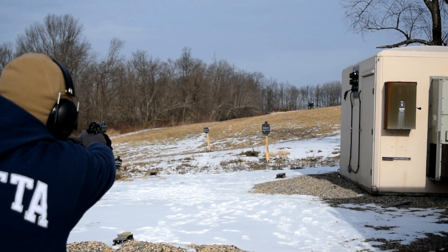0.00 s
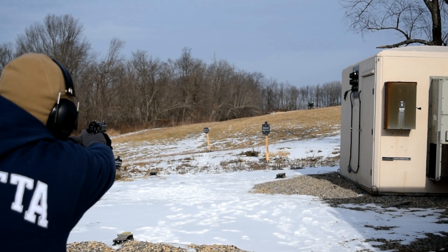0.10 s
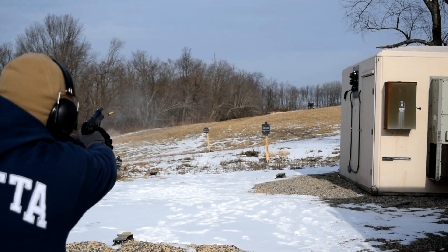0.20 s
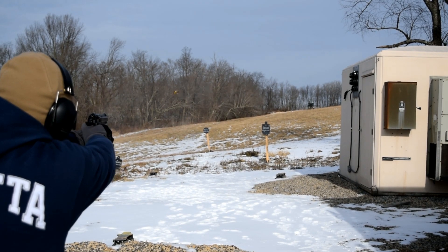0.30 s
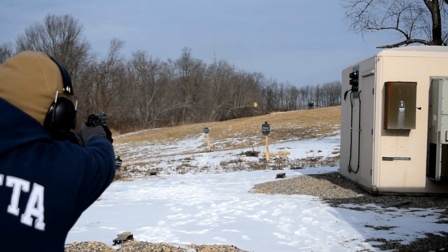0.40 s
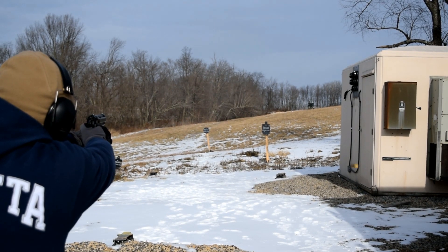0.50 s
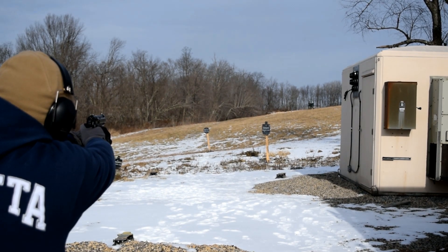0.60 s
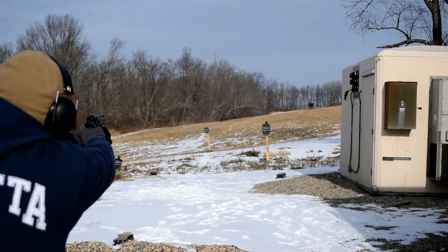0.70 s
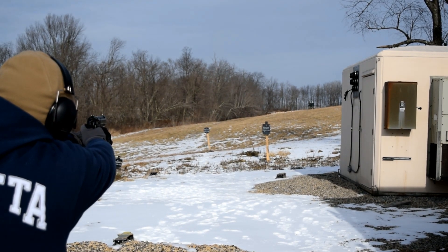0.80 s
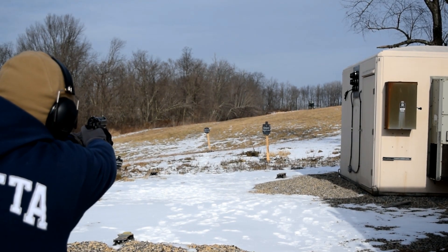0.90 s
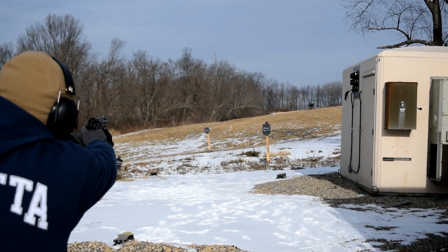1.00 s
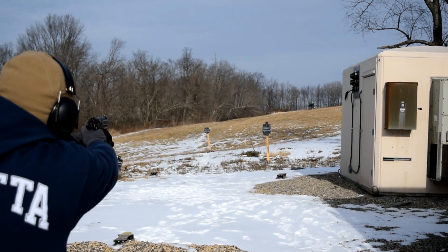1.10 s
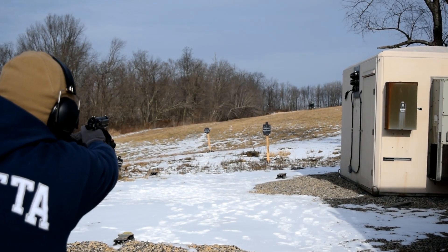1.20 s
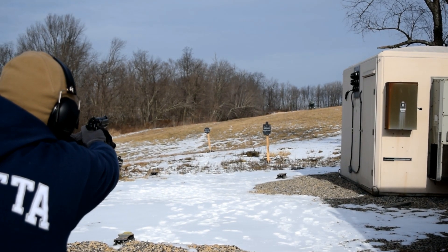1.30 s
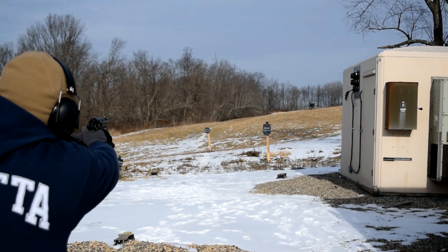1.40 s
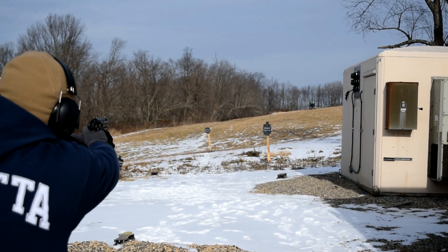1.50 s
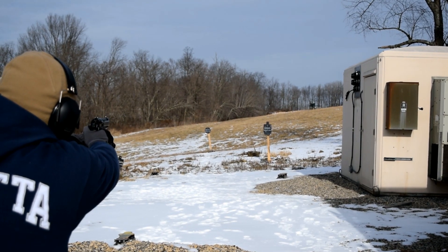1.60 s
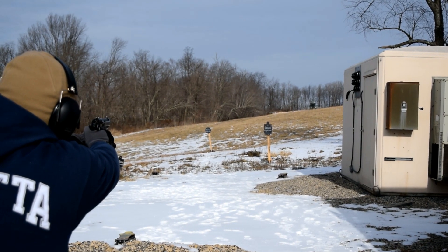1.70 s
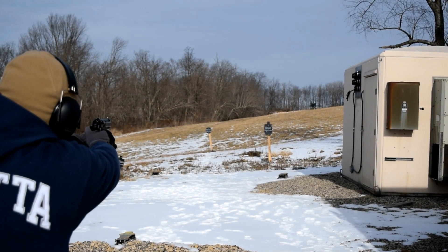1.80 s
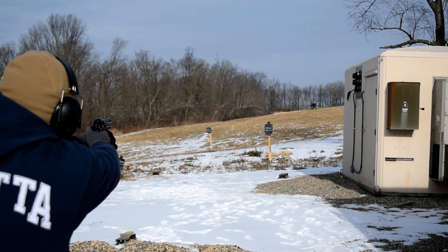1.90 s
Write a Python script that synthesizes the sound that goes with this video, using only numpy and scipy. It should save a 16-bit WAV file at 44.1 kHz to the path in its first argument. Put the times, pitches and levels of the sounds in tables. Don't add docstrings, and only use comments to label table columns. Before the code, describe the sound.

Faint wind and hiss, then a single hard pistol blast close to the microphone, a rapid clatter of slap echoes, and a rough mid-toned rumble from distant trees fading away, with the background ducked then returning.

```python
import sys
import numpy as np
from scipy import signal
from scipy.fft import rfft, irfft
from scipy.io import wavfile
from scipy.ndimage import uniform_filter1d, minimum_filter1d, map_coordinates

SR = 44100
rng = np.random.default_rng(int(sys.argv[2]) if len(sys.argv) > 2 else 0)


def dump(signal):
    limited = np.clip(np.atleast_2d(signal).T, -1, 1)
    pcm = np.round(limited * 32767).astype(np.int16)
    wavfile.write(sys.argv[1], SR, pcm)


def to_linear_factor(level_db):
    exponent = np.asarray(level_db, float) / 20
    return 10 ** exponent


N = 88200

SHOT_S = 0.2484
BLAST_DB, BLAST_T60_S = 24, 0.059
# start_s, body_db, edge_db, pitch_hz, t60_s (time to fade by 60 dB)
SLAPS = [(0.303, 10.5, -8, 725, 0.011), (0.311, -7.5, -17, 926, 0.011), (0.318, -5, -31, 1013, 0.011),
         (0.328, -5, -17, 882, 0.011), (0.355, -0.5, -76, 875, 0.011), (0.374, -1.5, -12, 927, 0.011),
         (0.391, -16.5, -30, 895, 0.011), (0.403, -32, -30.5, 743, 0.011), (0.418, 1, -4.5, 1157, 0.011),
         (0.421, -16.5, -43, 1110, 0.011), (0.448, -18, -27, 1340, 0.011), (0.473, -21.5, -23, 960, 0.011),
         (0.494, -23, -34.5, 834, 0.011), (0.525, -25, -38, 894, 0.011), (0.56, -18, -27, 1060, 0.011),
         (0.571, -14.5, -29, 1040, 0.011)]
# start_s, peak_db
TICKS = [(0.5894, -32), (0.6075, -31), (0.627, -34), (0.6519, -31), (0.6714, -32), (0.6914, -35),
         (0.7472, -33), (0.8254, -42), (0.9547, -28), (0.9614, -37), (0.9794, -42), (1.0051, -41),
         (1.0114, -39), (1.072, -34), (1.1353, -37), (1.2296, -37), (1.3374, -54), (1.5279, -36)]
# frequency_hz, level_db
FAR_TONE = [(120, -32), (250, -33), (370, -16), (600, -3), (760, 0), (980, 0), (1300, -12), (1700, -26),
            (4000, -77.5)]
# frequency_hz, level_db
BRIGHT_TONE = [(1200, -23.5), (1900, 4.5), (2600, 10.5), (3100, -3.5), (3500, -10), (4500, -15),
               (8000, -66)]
# frequency_hz, level_db
SHARP_TONE = [(800, 4.5), (2500, 15), (8000, 0.5), (16000, -15.5)]
# frequency_hz, level_db
FIZZ_TONE = [(2000, -19), (3500, 4.5), (5000, 0), (8000, -12.5), (15000, -28.5)]


def seconds():
    return np.arange(N) / SR


def noise():
    return rng.standard_normal(N)


def unit(x):
    return x / np.sqrt(np.mean(x ** 2) + 1e-20)


def curve(rows):
    times, values = np.transpose(rows)
    return np.interp(seconds(), times, values)


def wobble(rate_hz):
    points = rng.standard_normal(int(N * rate_hz / SR) + 4)
    return map_coordinates(points, [np.arange(N) * rate_hz / SR])


def colour(x, tone):
    size = 8192
    hz, db = np.transpose(tone)
    bins = np.fft.rfftfreq(size, 1 / SR)
    gain = to_linear_factor(np.interp(np.log(bins + 1), np.log(hz), db))
    cepstrum = irfft(np.log(np.maximum(gain, 1e-4)))
    cepstrum[1:size // 2] *= 2
    cepstrum[size // 2 + 1:] = 0
    response = irfft(np.exp(rfft(cepstrum)))
    return signal.fftconvolve(x, response / np.linalg.norm(response))[:N]


def bursts(rows):
    out, t = np.zeros(N + SR), np.arange(SR // 2) / SR
    for start, db, t60 in rows:
        out[round(start * SR):][:len(t)] += to_linear_factor(db - 60 * t / t60) * rng.standard_normal(len(t))
    return out[:N]


def puff(level_db, centre_s, width_s):
    return noise() * to_linear_factor(level_db) * np.exp(-((seconds() - centre_s) / width_s) ** 2)


def limited(x, top, hold_s):
    hold = round(hold_s * SR)
    need = np.minimum(1, top / (np.abs(x) + 1e-9))
    return x * uniform_filter1d(minimum_filter1d(need, 2 * hold), hold)


def squeeze(x, top, hard):
    return x / (1 + np.abs(x / top) ** hard) ** (1 / hard)


def ambience():
    # frequency_hz, level_db
    wind_tone = [(15, -5), (25, -3.5), (59, -6), (162, -15), (280, -10), (408, -18.5), (810, -23.5),
                 (945, -19), (1500, -44), (1950, -81), (3300, -120)]
    # frequency_hz, level_db
    hiss_tone = [(1000, 4.5), (3000, -3.5), (15000, -4)]
    # time_s, hiss_level_db
    gain_moves = [
        (0.0, -52.5),
        (0.38, -50.5),
        (0.53, -63.5),
        (0.71, -84),
        (0.91, -71),
        (1.18, -67),
        (1.48, -60),
        (1.85, -51.5),
        (2.0, -53.5),
    ]
    wind_db, gust_db, hiss_db = 17, 2, 3
    wind = unit(colour(noise(), wind_tone)) * to_linear_factor(1 + wind_db + gust_db * wobble(5.34))
    hiss = unit(colour(noise(), hiss_tone)) * to_linear_factor(hiss_db)
    return to_linear_factor(curve(gain_moves)) * (wind + hiss)


def spent_case():
    # frequency_hz, level_db
    case_tone = [(5000, -25), (10000, 0), (16000, 0)]
    return colour(bursts([(0.9555, -34, 0.012)]), case_tone)


def trunks():
    per_s, spread_db, biggest = 1400, 5, 0.15
    chance, side, size = rng.random((3, N))
    hits = (chance < per_s / SR) * np.sign(side - 0.5)
    return unit(hits * to_linear_factor(-spread_db * np.log(size + biggest)))


def hillside():
    # time_s, level_db
    hill_levels = [(0.44, -38), (0.444, -32), (0.574, -20), (0.592, -6.5), (0.934, -16), (1.012, -7),
                   (1.052, -16.5), (1.13, -14), (1.142, -15.5), (1.152, -12), (1.452, -19.5), (1.534, -16),
                   (1.578, -21.5), (1.634, -19.5), (1.664, -15), (1.674, -19.5), (1.99, -27), (2.0, -28)]
    bright_s, bright_rise_s = 0.57, 0.13
    edge_db, edge_loss_db_per_s = -36, 15
    fizz_db, fizz_loss_db_per_s = -43.5, 41.5
    t = seconds()
    echoes = trunks()
    lumps = to_linear_factor(0.9 * wobble(30.03) + 1.5 * wobble(120))
    for start, db in TICKS:
        echoes[round(start * SR)] = to_linear_factor(27.5 + max(db, -34) / 2)
    fade_in = np.clip((t - SHOT_S) / 0.26, 0, 1)
    roll = colour(echoes * lumps * to_linear_factor(curve(hill_levels)) * fade_in, FAR_TONE)

    echoes = np.clip(echoes, -6, 6)
    early, late = np.maximum(bright_s - t, 0), np.maximum(t - bright_s, 0)
    swell = np.exp(-(early / bright_rise_s) ** 2) * lumps ** 1.2 * (t > SHOT_S)
    edge_level = swell * to_linear_factor(edge_db - edge_loss_db_per_s * late)
    edge = colour((echoes + noise()) * edge_level, BRIGHT_TONE)
    fizz_level = swell * to_linear_factor(fizz_db - fizz_loss_db_per_s * late)
    fizz = colour((0.69 * echoes + noise()) * fizz_level, FIZZ_TONE)
    return limited(roll, 0.62, 0.004) + edge + fizz


def bank_thud():
    hz = 198
    thud_tone = [(hz / 3, -25), (hz, 0), (hz * 2, -20), (2000, -70)]
    return colour(puff(-27.5, 0.559, 0.054), thud_tone)


def sheen():
    return colour(puff(-44, 0.578, 0.045), SHARP_TONE)


def ticks():
    # frequency_hz, level_db
    tick_tone = [(1800, -22), (3500, 0), (7000, -2), (11000, -10), (16000, -16)]
    out = np.zeros(N)
    for start, db in TICKS:
        places = round(start * SR) + np.array([50, 52, 75])
        out[places] = to_linear_factor(db + 8) * np.array([1, 0.2, rng.uniform(-0.5, 0.5)])
    return colour(out * to_linear_factor(-1), tick_tone)


def low_scatter():
    # frequency_hz, level_db
    low_tone = [(120, -24), (300, 8.5), (500, -1.5), (900, -26), (3000, -61.5)]
    return colour(bursts([(SHOT_S, -18.5, 0.47)]), low_tone)


def ground_scatter():
    body = colour(bursts([(SHOT_S, -15.5, 0.93)]), FAR_TONE)
    bright = colour(bursts([(SHOT_S, -30.5, 0.5)]), FIZZ_TONE)
    return body + bright


def plate():
    # pitch_hz, level_db
    plate_modes = [(1380, -9.5), (2300, -12.5), (4000, -14.5)]
    start_s, t60_s = 0.3748, 0.02
    t = np.maximum(seconds() - start_s, 0)
    return sum(to_linear_factor(db - 60 * t / t60_s) * np.sin(2 * np.pi * hz * t) for hz, db in plate_modes)


def snap():
    start_s, gap_s, push_s = 0.4193, 0.0022, 0.0005
    starts = np.array([[start_s], [start_s + gap_s]])
    strengths = np.array([[1], [0.35]])
    u = np.maximum(seconds() - starts, 0) / push_s
    return (strengths * (u > 0) * (1 - 1.1 * u) * np.exp(-u)).sum(axis=0)


def slaps():
    rise_s, sharpness = 0.0008, 1.94
    edge = bursts([(s + 0.0008, db + 3, 0.6 * t60) for s, _, db, _, t60 in SLAPS])
    middle = bursts([(s + 0.00081, db + 1, t60) for s, _, db, _, t60 in SLAPS])
    body, t = np.zeros(N), np.arange(2048) / SR
    for start, db, _, hz, t60 in SLAPS:
        ring = to_linear_factor(-60 * t / t60) * rng.standard_normal(len(t)) * (1 - np.exp(-t / rise_s))
        peak = signal.iirpeak(hz, sharpness, SR)
        ring = signal.lfilter(*peak, signal.lfilter(*peak, ring))
        body[round(start * SR):][:len(t)] += to_linear_factor(db) * ring / np.abs(ring).max()
    return body + colour(middle, BRIGHT_TONE) + colour(edge, SHARP_TONE)


def boom():
    start_s, level_db, start_hz, drop_s, t60_s = 0.305, -10, 200, 0.008, 0.11
    t = np.maximum(seconds() - start_s, 0)
    cycles = start_hz * drop_s * np.log(1 + t / drop_s)
    rise = 1 - np.exp(-t / 0.0024)
    return to_linear_factor(level_db - 60 * t / t60_s) * np.sin(2 * np.pi * cycles) * rise


def strike_and_crack():
    strike = (0.2420, -28, 0.05)
    crack = (SHOT_S, 19, 0.022)
    blast_edge = (SHOT_S, BLAST_DB - 36.5, BLAST_T60_S)
    return colour(bursts([strike, crack, blast_edge]), SHARP_TONE)


def blast():
    # frequency_hz, level_db
    blast_tone = [(40, -21.5), (160, -9.5), (400, -13), (750, 4), (1300, -10.5), (2500, -31), (5000, -36)]
    end_s, fall_s = 0.281, 0.004
    ending = 1 / (1 + np.exp(np.clip((seconds() - end_s) / fall_s, -50, 50)))
    return colour(bursts([(SHOT_S, BLAST_DB, BLAST_T60_S)]) * ending, blast_tone)


def scene():
    shot = blast() + ground_scatter() + strike_and_crack()
    returns = slaps() + boom() + ticks() + snap() + plate()
    ground = spent_case() + low_scatter()
    trees_and_bank = hillside() + bank_thud() + sheen()
    return (shot + returns + ground + trees_and_bank + ambience())[None]


def top_cut(x):
    return signal.sosfilt(signal.butter(12, 15680, fs=SR, output="sos"), x)


def record(dry):
    overloaded = squeeze(dry, top=0.92, hard=5)
    sagged = signal.lfilter(*signal.butter(1, 60, "high", fs=SR), overloaded)
    return top_cut(np.clip(sagged, -1, 1))


dry = scene()
out = record(dry)
dump(out)
```